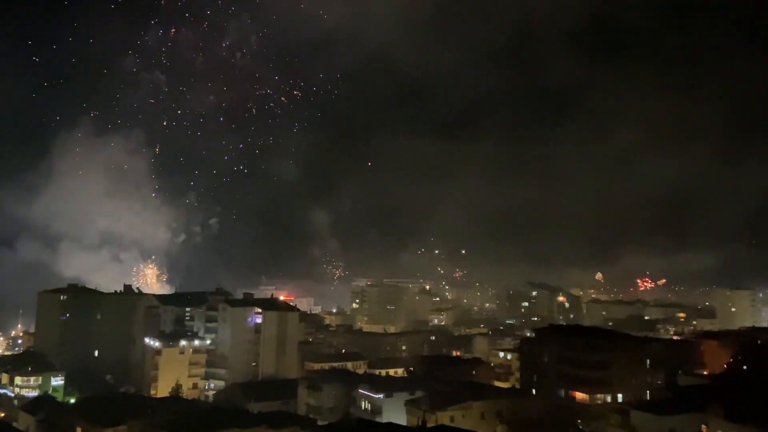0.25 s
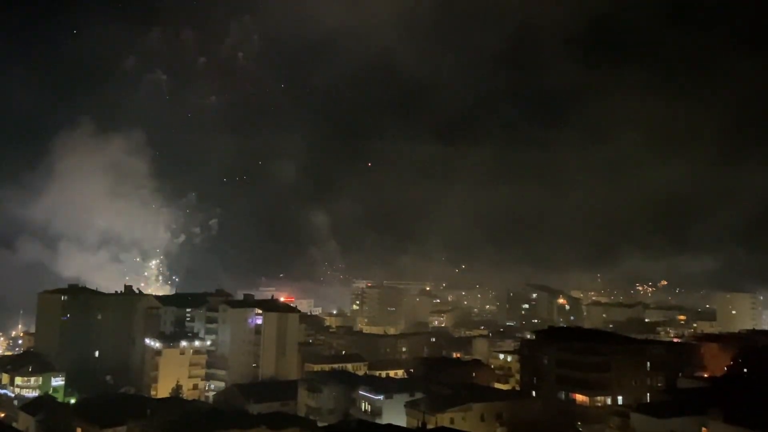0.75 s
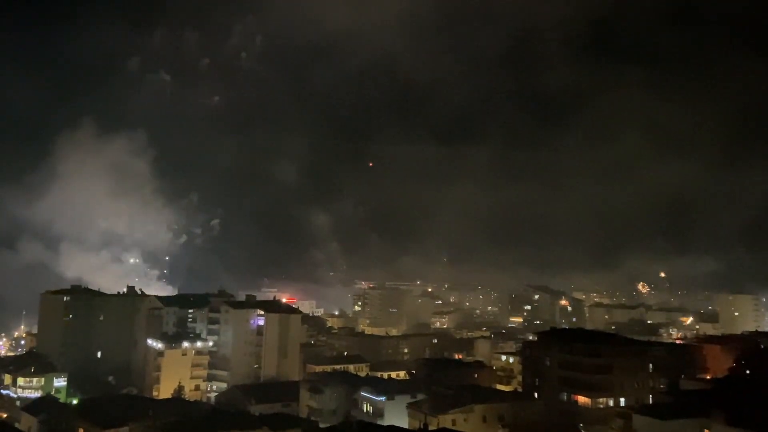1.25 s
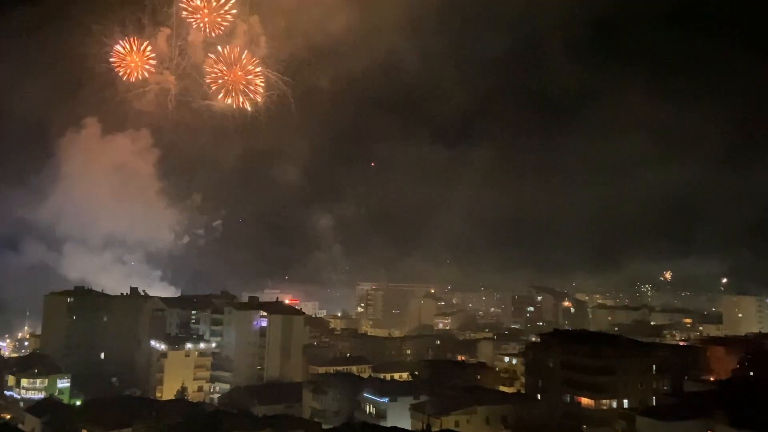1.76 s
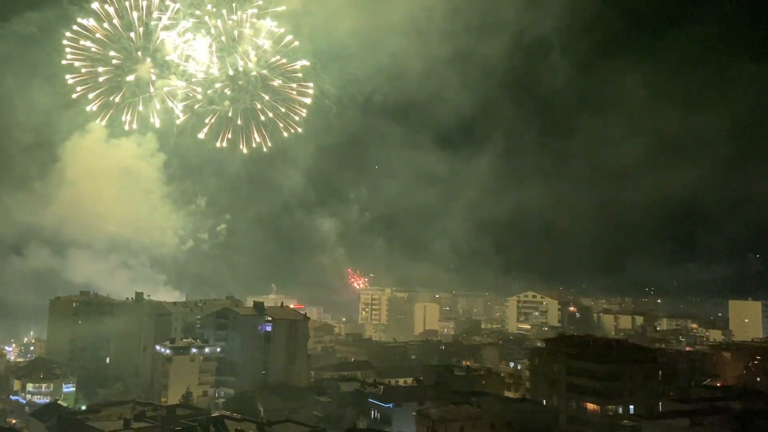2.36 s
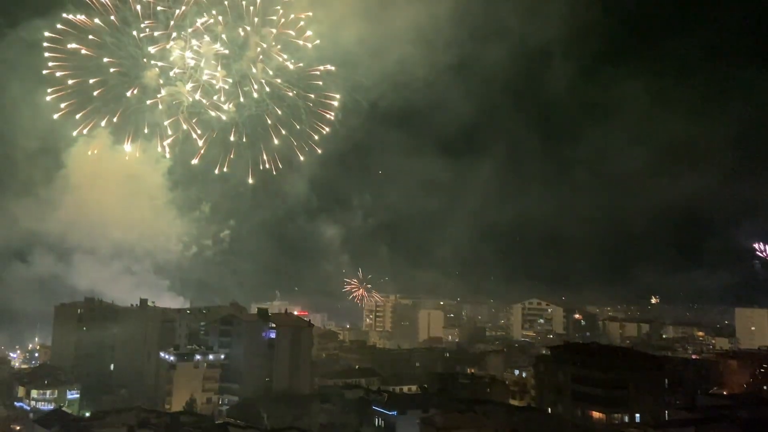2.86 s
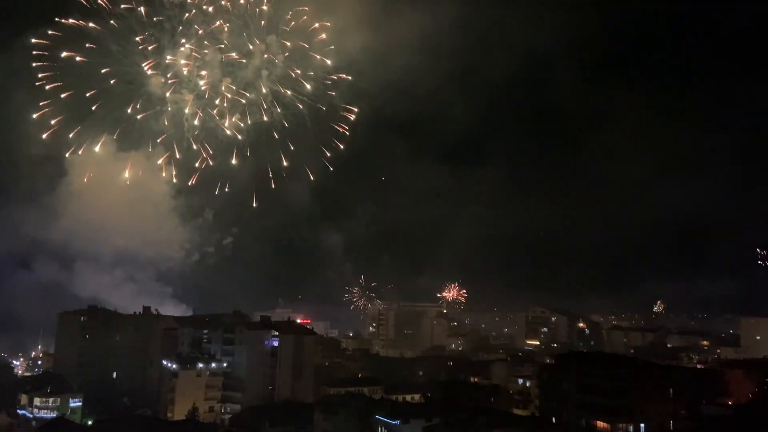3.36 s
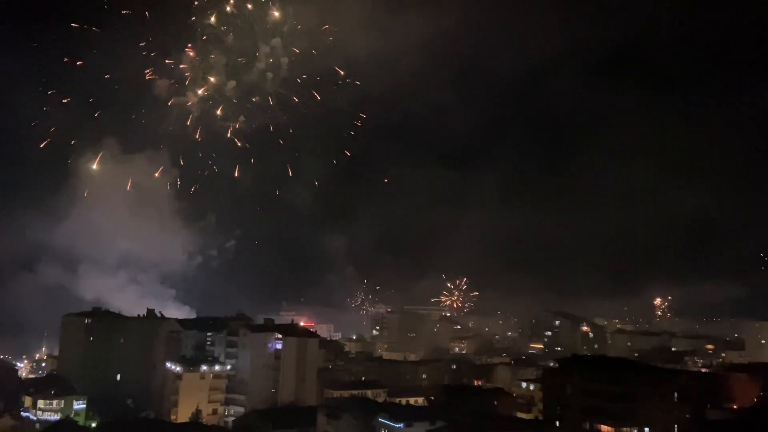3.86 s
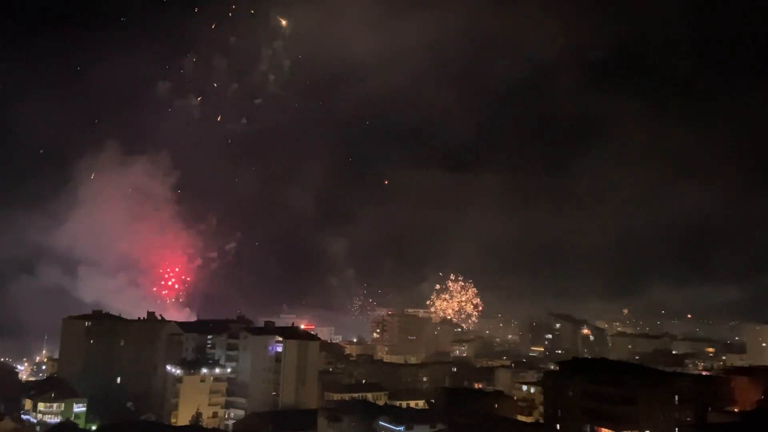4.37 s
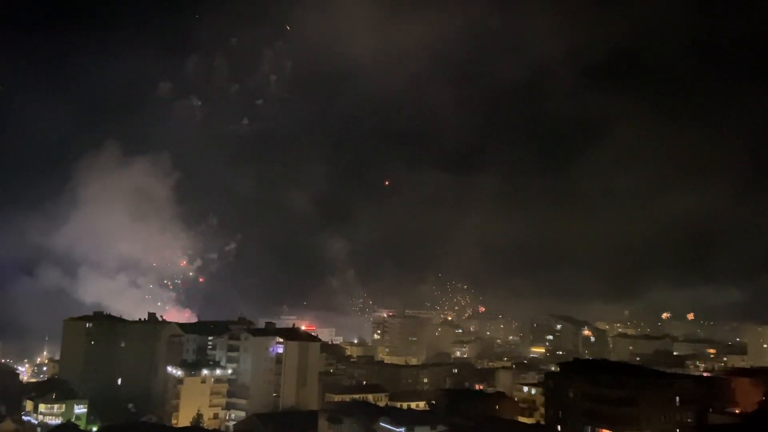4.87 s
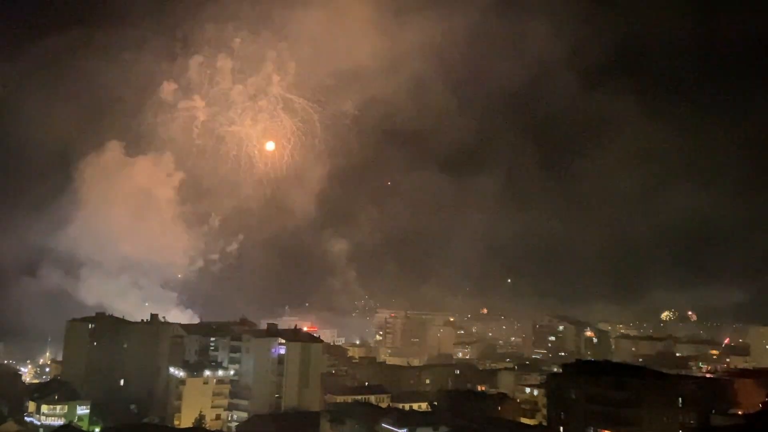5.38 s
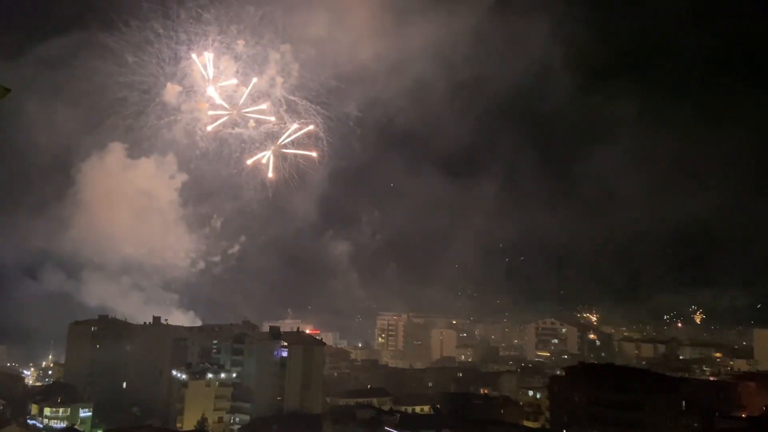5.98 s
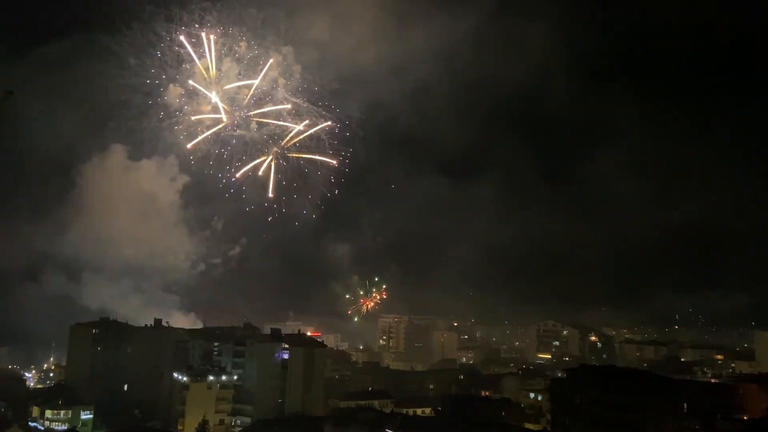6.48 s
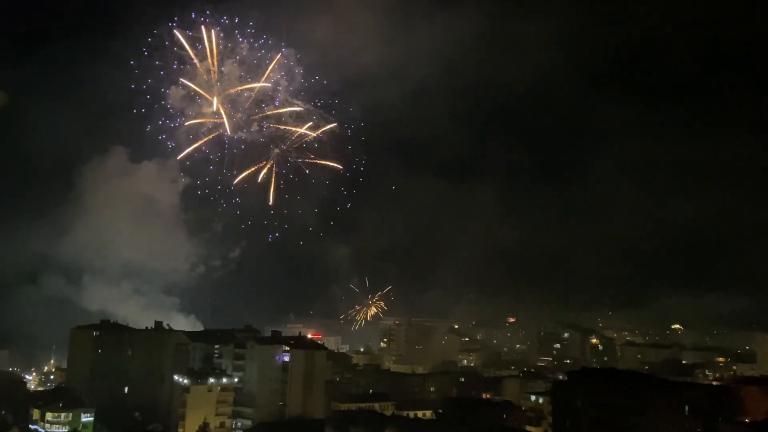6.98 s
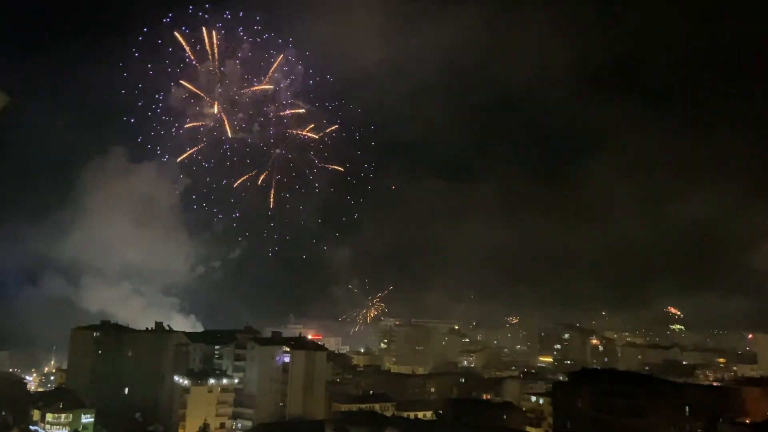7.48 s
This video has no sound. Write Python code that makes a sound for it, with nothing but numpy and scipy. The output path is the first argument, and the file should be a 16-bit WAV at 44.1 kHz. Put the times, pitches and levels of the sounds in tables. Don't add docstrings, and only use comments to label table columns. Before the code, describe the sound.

Fireworks over a night town: hard near bangs, mostly from the left, with crackling stars and a rolling roar of far bursts echoing between buildings.

```python
import sys
import numpy as np
from scipy import signal
from scipy.fft import rfft, irfft, next_fast_len
from scipy.io import wavfile
from scipy.ndimage import uniform_filter1d, minimum_filter1d

SR = 44100
rng = np.random.default_rng(int(sys.argv[2]) if len(sys.argv) > 2 else 0)


def to_linear_factor(level_db):
    exponent = np.asarray(level_db, float) / 20
    return 10 ** exponent


def pcm_store(signal):
    levels = np.round(np.clip(np.atleast_2d(signal), -1, 1) * 32767)
    wavfile.write(sys.argv[1], SR, levels.astype(np.int16).T)


N = 340893
CONTROL_STEP = 40
CONTROL_S = np.arange(0, N + CONTROL_STEP, CONTROL_STEP) / SR

LAYER_HZ = [110, 500, 2200, 6000]
LULL_DB, USUAL_DB = [-40.5, -39, -53.5, -81.5], [-20, -28, -34, -46.5]
# f/Hz, density/dB
BARRAGE_COLOUR = [(25, -41.5), (55, -5), (95, -4.5), (130, 0), (190, -3), (470, -10), (900, -17.5),
                  (1400, -21), (2000, -23), (3250, -31), (6920, -46), (8140, -50.5), (10300, -59),
                  (14300, -82.5), (16500, -98)]
# f/Hz, left-right likeness/1
LIKENESS = [(40, 0.7), (130, 0.97), (300, 0.4), (700, 0.042), (1400, 0.41), (3000, 0.67), (4600, 0.71),
            (6400, 1.6)]
# t/s, left over right/dB
BARRAGE_SIDE = [
    (0.0, 8.5),
    (3.42, 7.5),
    (3.77, 2),
    (7.73, 1.5),
]
# start t/s, rise/s, rumble level/dB, roar over rumble/dB, fade/(dB/s)
ROLLS = [(0, 0.0019, -30, 4, 7.5), (.56, 0.022, -29.5, -2.5, 47.5), (1.009, 0.026, -38, 6, 34.5),
         (1.19, 0.032, -54.5, 4.5, 24), (1.519, 0.042, -48.5, 15, 56.5), (1.713, 0.012, -37, 6.5, 60.5),
         (2.2, 0.055, -47.5, 11, 53), (2.44, 0.037, -44, 14, 75.5), (2.71, 0.02, -15.5, -10.5, 72),
         (2.78, 0.056, -24.5, -1.5, 45.5), (2.93, 0.15, -19, -3.5, 9.5), (3.6, 0.13, -24.5, 2.5, 30),
         (4.341, 0.03, -40.5, 15, 10.5), (4.791, 0.014, -28.5, 1.5, 49), (5.2, 0.037, -38, 6.5, 18.5),
         (5.55, 0.095, -35.5, -6, 20), (6.258, 0.016, -36.5, 6.5, 159.5), (5.88, 0.015, -42.5, 11, 48.5),
         (6.389, 0.008, -28.5, -0.5, 39.5), (6.629, 0.022, -10.5, -12, 158), (6.8, 0.0056, -15, -6, 47),
         (6.89, 0.045, -14.5, -11, 168), (7.0, 0.21, -15, -8, 15.5), (7.649, 0.083, -16, -8, 32)]
# start t/s, rise/s, crackle level/dB, fizz over crackle/dB, fade/(dB/s)
SALVOS = [(0, 0.00078, -38, -6, 79.5), (0.088, 0.039, -36, -13, 26), (.555, 0.011, -42, -22.5, 61),
          (1.014, 0.007, -39, -9.5, 39.5), (1.605, 0.022, -42.5, -5.5, 30),
          (1.715, 0.026, -31.5, -11, 73.5), (2.12, 0.16, -44.5, -11.5, 108.5),
          (2.44, 0.057, -45.5, -10, 122.5), (2.715, 0.0069, -38, -8, 41), (4.44, 0.019, -32.5, -16, 77),
          (2.79, 0.075, -44.5, -1.5, 130), (2.929, 0.038, -34.5, -9, 19), (3.4, 0.029, -30, -13, 30),
          (3.698, 0.017, -34.5, -14.5, 68.5), (4.345, 0.04, -35, -16.5, 17.5),
          (4.792, 0.013, -38, -33.5, 46), (5.201, 0.025, -43.5, -13.5, 84), (5.5, 0.35, -37, -38, 41.5),
          (5.892, 0.014, -48.5, -7, 49.5), (6.395, 0.01, -37, -10, 55.5), (6.65, 0.038, -33.5, -12, 146),
          (6.811, 0.034, -32, -14.5, 63), (6.95, 0.022, -34, -11, 16.5), (7.15, 0.11, -32.5, -23, 38.5)]
# middle t/s, peak level/dB, pitch
# f/Hz, half width/ms
STREET_RINGS = [(0.251, -28, 170.0, 17), (0.494, -26.5, 108, 16), (0.678, -24, 160.0, 15), (1.013, -27, 170.0, 11),
                (2.027, -28, 156, 13), (2.186, -26, 111, 12), (2.317, -32, 161, 16), (3.186, -12.5, 134, 8.3),
                (3.715, -16, 148, 18), (3.889, -19, 138, 15), (4.025, -25, 179, 11), (4.147, -26, 139, 14.0),
                (4.268, -21, 173, 13), (4.743, -27, 199, 12), (5.086, -29, 191, 18), (5.359, -25.5, 130.0, 11),
                (5.731, -28.5, 254, 10), (6.018, -32, 230.0, 11), (6.137, -28.5, 151, 14.0),
                (6.745, -25, 130.0, 13), (6.91, -6, 93, 11), (7.078, -20, 208, 16), (7.165, -20, 170.0, 14.0),
                (7.223, -18, 122, 16), (7.275, -27, 113, 12), (7.394, -15, 130.0, 13),
                (0.212, -23, 540.0, 4.9), (0.237, -23, 580, 5.1), (0.461, -24.5, 368, 6.5),
          (1.059, -24, 520.0, 5), (1.738, -27, 590.0, 4.2), (2.858, -23, 400.0, 3.3),
          (2.901, -25, 387, 4.8), (2.945, -23, 375, 5.6), (2.977, -17.5, 350, 6.6), (3.072, -20, 424, 6.2),
          (3.263, -19.5, 404, 5.6), (3.312, -23, 490.0, 5.1), (3.369, -23, 447, 5.6),
          (3.476, -18.5, 410.0, 5.6), (4.394, -29, 500.0, 6.9), (4.5, -23.5, 590.0, 6.5),
          (4.525, -22, 460, 4.6), (6.687, -25, 413, 3.5), (6.86, -28, 400.0, 5.6), (7.206, -27, 390.0, 5.1),
          (7.347, -23, 513, 7.2), (7.438, -32, 394, 4.6),
                (1.44, -29, 600, 4), (1.533, -25.5, 446, 9.6), (2.5, -36, 101, 25), (3.04, -27, 735, 7.7),
               (3.115, -17, 138, 19), (3.15, -17, 150, 11), (3.522, -17, 550, 10), (2.49, -28.5, 700, 8.0),
               (5.572, -29, 560, 6.1), (6.995, -17, 620, 4.0), (7.31, -22, 200, 11), (7.36, -18, 171, 11),
               (7.567, -14.5, 170, 10)]
# t/s, noise level before shaping/dB, centre f/Hz, length/ms
PUFFS = [(1.048, -24, 1550, 4.4), (1.591, -29.5, 1730, 6.4), (1.666, -32, 1960, 5.0),
         (1.6834, -29, 1910, 5.0), (1.738, -32, 1980, 5.0), (1.746, -25, 1630, 3.7),
         (1.787, -29, 2060, 4.5), (1.8054, -36, 2380, 5.0), (2.9644, -42, 1720, 4.3),
         (2.9974, -36, 2660, 4.4), (3.0144, -35, 2080, 4.6), (3.0614, -24, 1890, 4.2),
         (3.33, -29, 1840, 5.0), (3.3574, -31, 1670, 5.0), (3.6546, -32, 2080, 5.0),
         (3.673, -22.5, 2080, 5.0), (3.699, -21.5, 2280, 5.8), (3.7258, -20, 1570, 5.7),
         (4.373, -24, 1800, 4.1), (4.394, -20, 1720, 5), (4.4598, -33, 1790, 5.0), (4.4714, -25, 1810, 4.5),
         (4.494, -26, 1670, 5.0), (4.5244, -26, 1650, 5.0), (4.5494, -33, 2030, 5.0),
         (5.0135, -31, 1710, 5.0), (5.2744, -36, 1900, 4.3), (5.5184, -37, 2030, 5.0),
         (5.5676, -29, 1540, 9.8), (5.598, -31, 1710, 5.0), (5.6153, -32, 1950, 7.3),
         (5.6446, -32, 2000, 5.0), (5.685, -37, 2210, 5.0), (5.7215, -25.5, 1620, 4.6),
         (5.7716, -31.5, 1840, 4.5), (5.805, -29, 1650, 5.5), (5.8313, -26, 1830, 7.1),
         (5.878, -28, 1670, 7.5), (5.9394, -27, 1820, 5.0), (5.986, -27.5, 1560, 5.0),
         (6.024, -30, 1630, 5.0), (6.0578, -31, 1940, 5.0), (6.09, -27.5, 1830, 4.6),
         (6.1068, -27, 1630, 5.7), (6.1514, -42, 1870, 5.0), (6.2774, -37, 2050, 3.9),
         (6.315, -27.5, 1810, 4.3), (7.7119, -9.5, 1650, 5.8),
         (1.4258, -33, 2170, 4.0), (3.4555, -17, 1800, 4.4), (3.567, -21, 1300, 5.0),
           (3.743, -20, 2100, 5.0), (4.68, -37, 1700, 7.3), (4.70, -33, 2000, 6.6), (4.852, -31, 1700, 6.0),
           (4.879, -27, 2200, 4.2), (6.2545, -30, 1150, 7.7), (7.52, -34, 1500, 8.0),
           (7.59, -30, 1500, 8.0)]
# f/Hz, t60/s, level/dB
HOUSE_FRONTS = [
    (60, 0.42, -23.5),
    (260, 0.042, -8),
    (1010, 0.083, -20.5),
    (4000, 0.022, -2),
]
# t/s, peak level/dB
STARS = [(0.332, -34), (0.469, -29), (2.162, -35), (2.144, -36), (1.529, -43), (2.33, -34), (3.262, -23),
         (3.3106, -21), (3.8097, -32), (4.3271, -50), (4.35, -29), (4.4565, -36), (1.747, -19),
         (1.775, -25.5), (3.427, -21), (4.486, -29), (5.1023, -41), (6.482, -23), (6.765, -27),
         (6.972, -19)]
# t/s, peak level/dB, top above 5.4 kHz over that level/dB, left over right/dB
CRACKS = [(0.0005, -31, -19, 14), (0.3027, -26.5, -35, 10), (0.5564, -11, -63, 0),
          (1.0221, -19.5, -16.5, 10), (1.08, -19, -41, 4), (1.1902, -13, -52, 6.5), (1.6106, -28, -30, 3),
          (1.721, -9.5, -48, 1), (2.7164, -9, -28, 10.5), (2.7472, -22.5, -41.5, 5), (2.796, -6.5, -35, 17),
          (2.8013, -11.5, -30, -2), (2.8409, -19, -21.5, 7), (2.9532, -22, -22.5, 8),
          (3.0609, -21.5, -48, 11), (3.4077, -7, -20, 6), (3.449, -14, -10, 14), (3.5018, -9, -48, 7),
          (3.6044, -21.5, -40, -10), (3.7374, -18, -52, -1), (4.3889, -26, -42, 9), (4.7915, -34, -54, 5),
          (4.7965, -24, -55, -1), (5.2097, -14, -49.5, 7), (5.213, -18, -50, 0), (6.3989, -24.5, -17.5, 7),
          (6.4577, -18.5, -33, 2), (6.6518, -12, -18, 14), (6.6852, -22, -32.5, 11), (6.8159, -7, -20, 12),
          (6.894, -8.5, -29, 9), (6.9267, -19, -26, 7), (6.9519, -7.5, -29.5, -8.5),
          (6.993, -12.5, -21.5, 1), (7.7097, -15.5, -61, 0)]
# t/s, left peak level/dB, overpressure/ms, left over right/dB
THUDS = [(0.1042, -10, 1.2, 25), (0.1509, -13.5, 0.23, -4), (0.1643, -6, 1.5, 18), (0.57, -5.5, 0.71, 28),
         (0.7243, -8, 1.2, 17), (1.071, -8, 0.066, 11), (1.1984, -10.5, 0.7, 10), (1.528, -8.5, 0.16, 15),
         (1.584, -9, 0.39, 8), (1.7533, -4, 0.34, 26), (2.163, -9, 0.54, 11), (2.253, -14.5, 0.36, 3),
         (2.7231, -3, 3, 21), (2.7419, -3.5, 2, 26), (3.158, -6, 3.4, 13), (3.616, -8.5, 0.84, 1),
         (4.4845, -6, 0.045, 2), (4.802, -9, 0.99, 9), (4.8693, -11, 0.23, 15), (5.2187, -6.5, 0.78, 5),
         (5.2904, -9, 0.71, 0.5), (5.5679, -15.5, 0.28, 6), (6.255, -15, 1, 0), (6.3157, -23, 0.74, 9),
         (6.4497, -7, 0.074, 11), (6.6595, -8, 4.2, -1), (6.6858, -7.5, 1.1, 1), (7.497, -8.5, 1.2, 15),
         (7.56, -11, 3, 1), (7.654, -7.5, 4.1, 1), (2.4950, -13.5, 0.26, 5), (2.8098, -13, 0.24, 12),
         (4.3518, -16, 0.5, 0), (5.56, -13, 0.56, 3), (6.9535, -7, 0.58, 11), (3.19, -10, 1.7, 11),
         (3.34, -4.5, 4.4, 7)]
# t/s, left peak level/dB, overpressure/ms, ground echo/ms, left over right/dB
SHELLS = [(0.301, -5.5, 1, 2, 8), (0.557, 6, 1.16, 4.5, 8.5), (1.0224, -3.5, 0.71, 2.52, 14),
          (1.1906, 5.5, 0.53, 2.57, 12), (1.721, -2.5, 0.23, 4.8, 7.5), (1.8691, -5, 0.84, 6.3, 9),
          (2.717, 8, 2.1, 2.45, 15), (2.7965, 12.5, 0.47, 5.6, 20), (3.408, 4, 0.59, 1.8, 4.5),
          (3.4503, 3.5, 0.49, 5.2, 17), (3.502, 6, 0.64, 2.34, 10), (3.7379, 3, 0.9, 3.74, 2.5),
          (4.3281, -5.5, 0.65, 3.5, 7), (4.7924, 8, 0.66, 4.2, 4), (5.2109, 5, 0.74, 2.53, 5),
          (6.241, -5, 0.67, 6.13, 0), (6.3017, -7.5, 0.75, 1.98, 3.5), (6.3988, -4, 0.7, 2.74, 3),
          (6.652, 7.5, 1.5, 2.87, 5.5), (6.8166, 7.5, 1.24, 2.1, 8), (6.895, 5.5, 1.2, 2.45, 6),
          (6.953, -16.5, 0.21, 2.2, -14), (6.9931, -3.5, 0.94, 1.6, 17), (7.7084, 4, 1.2, 3.66, 4.5)]


def rms_one(x):
    return x / np.sqrt(np.mean(x ** 2) + 1e-20)


def at_hz(points, hz):
    points_hz, values = np.transpose(points)
    return np.interp(np.log(hz), np.log(points_hz), values)


def band(x, low_hz, high_hz):
    sos = signal.butter(2, [low_hz, min(high_hz, .45 * SR)], "band", fs=SR, output="sos")
    return signal.sosfilt(sos, x)


def dull(x, hz):
    r = np.exp(-2 * np.pi * hz / SR)
    return signal.lfilter([1 - r], [1, -r], x)


def phase_shift(x, hz):
    k = np.tan(np.pi * hz / SR)
    c = (k - 1) / (k + 1)
    return signal.lfilter([c, 1], [1, c], x)


def drift(rate_hz):
    r = np.exp(-2 * np.pi * rate_hz * CONTROL_STEP / SR)
    noise = rng.standard_normal(len(CONTROL_S) + 2000)
    return rms_one(signal.lfilter([1], [1, -2 * r, r * r], noise)[2000:])


def stretch(slow):
    return np.interp(np.arange(N) / CONTROL_STEP, np.arange(len(slow)), slow)


def pan(left_right_db):
    return to_linear_factor([[left_right_db / 2], [-left_right_db / 2]])


def barrage_side_db(t_s):
    return np.interp(t_s, *np.transpose(BARRAGE_SIDE))


def add(out, s, wave):
    i = round(s * SR)
    out[:, i:i + wave.shape[1]] += wave[:, :N - i]


def swell(rows, upper, fade_share):
    start_s, rise_s, level_db, upper_db, fade_db_s = np.transpose(rows)[:, :, None]
    since_s = CONTROL_S - start_s
    fade_db = fade_share * fade_db_s * np.maximum(since_s - rise_s, 0)
    level = to_linear_factor(level_db + upper * upper_db - fade_db)
    return np.sum((np.clip(since_s / rise_s, 0, 1) * level) ** 2, axis=0)


def layer_swells_db():
    powers = [swell(ROLLS, 0, 0.8), swell(ROLLS, 1.0, 1), swell(SALVOS, 0, 0.7), swell(SALVOS, 0.96, 1)]
    return np.array([10 * np.log10(power + to_linear_factor(2 * lull_db)) - usual_db
                     for power, lull_db, usual_db in zip(powers, LULL_DB, USUAL_DB)])


def far_bursts(pops_per_s=700.0, pop_spread_db=4.5, low_pop_share=0.41, high_pop_share=0.37):
    sizes = to_linear_factor(pop_spread_db * np.minimum(rng.exponential(1, (2, N)), 5)) * rng.choice([-1, 1], (2, N))
    chance = pops_per_s * stretch(to_linear_factor(2.5 * drift(15))) / SR
    pops = rms_one(sizes * (rng.random((2, N)) < chance))
    wash = rng.standard_normal((2, 2, N))
    share = np.array([low_pop_share, high_pop_share]).reshape(2, 1, 1, 1)
    return np.sqrt(share) * pops + np.sqrt(1 - share) * wash


def barrage(level_db=-23.5, patchy_db=1.61, top_swell=1.9, lag_cycles=0.58):
    swells_db = layer_swells_db()
    half_pan_db = barrage_side_db(CONTROL_S) / 2 * np.array([[1], [-1]])
    sources = far_bursts()
    out, together, edges_hz = 0, drift(9.6), 30 * 2 ** np.arange(0, 9.6, .5)
    for k, (low_hz, high_hz) in enumerate(zip(edges_hz, edges_hz[1:])):
        hz = np.sqrt(low_hz * high_hz)
        near, other = band(sources[int(hz > 2000), k % 2], low_hz, high_hz)
        place = np.interp(np.log(hz), np.log(LAYER_HZ), range(4))
        swell_db = np.maximum(1 - abs(place - np.arange(4)), 0) @ swells_db
        swell_db = np.interp(CONTROL_S - lag_cycles / hz, CONTROL_S, swell_db)
        swell_db = swell_db * at_hz([(4600, 0.95), (9100, top_swell)], hz)
        chance_db = patchy_db * (0.72 * together + drift(10.6))
        left, right = to_linear_factor(swell_db + chance_db + half_pan_db * (hz < 6000))
        alike = np.clip(at_hz(LIKENESS, hz), 0, 1)
        far_side = alike * near + np.sqrt(1 - alike ** 2) * other
        out = out + np.array([stretch(left) * near, stretch(right) * far_side])
    size = next_fast_len(N)
    colour = to_linear_factor(at_hz(BARRAGE_COLOUR, np.arange(1, size // 2 + 2) * SR / size))
    return to_linear_factor(level_db) * rms_one(irfft(rfft(out, size) * colour, size)[:, :N])


def booms(early_cycles=1.306, sag=0.16):
    out = np.zeros((2, N))
    rows = STREET_RINGS
    for (s, db, hz, half_ms), phase in zip(rows, rng.random(len(rows))):
        ms = np.arange(-3 * half_ms, 3 * half_ms, 1000 / SR)
        cycles = hz * ms / 1000 * (1 - sag * ms / half_ms / 4) + phase
        wave = np.exp(-(ms / half_ms) ** 2) * np.sin(2 * np.pi * cycles)
        start_s = s + ms[0] / 1000 - early_cycles / hz
        add(out, start_s, wave * to_linear_factor(db) * pan(barrage_side_db(s)))
    return out


def puffs(gain_db=-2.5, octaves=0.42, rise_ms=0.69, alike=0.76, air_hz=3900.0):
    out, ms = np.zeros((2, N)), np.arange(1500) / SR * 1000
    rows = PUFFS
    for (s, db, hz, length_ms), noise in zip(rows, rng.standard_normal((len(rows), 2, 1500))):
        shape = np.minimum(ms / rise_ms, 1) * np.exp(-ms / length_ms)
        pair = np.array([noise[0], alike * noise[0] + np.sqrt(1 - alike ** 2) * noise[1]])
        pair = rms_one(band(pair, hz / 2 ** octaves, hz * 2 ** octaves))
        puff = band(pair * shape, hz / 2.4, hz * 4.4)
        puff = dull(dull(puff, air_hz), air_hz)
        add(out, s, puff * to_linear_factor(db + gain_db) * pan(barrage_side_db(s)))
    return out


def house_fronts(x):
    t_s, tail = np.arange(12000) / SR, 0
    hits = rng.standard_normal((2, 12000)) * (rng.random((2, 12000)) < .05) * (t_s > .006)
    for hz, t60_s, db in HOUSE_FRONTS:
        tail = tail + to_linear_factor(db - 60 * t_s / t60_s) * band(hits, hz / 2, hz * 2)
    return signal.oaconvolve(x, tail, axes=1)[:, :N]


def sideways(x, turn_hz=1360.0, turn_width_hz=490.0):
    r = np.exp(-np.pi * turn_width_hz / SR)
    poles = [1, -2 * r * np.cos(2 * np.pi * turn_hz / SR), r * r]
    ahead = signal.lfilter(poles[::-1], poles, x[1, ::-1])[::-1]
    return np.array([x[0], ahead])


def roof_shimmer(top, level_db=-41.0, t60_s=0.36, rise_s=0.027):
    t_s = np.arange(12000) / SR
    envelope = np.minimum(t_s / rise_s, 1) * to_linear_factor(level_db - 60 * t_s / t60_s)
    tail = band(envelope * rng.standard_normal((1, 12000)), 5900, 14000)
    return band(signal.oaconvolve(top, tail, axes=1)[:, :N], 5900, 14000)


def cracks(body_db=14.0, top_db=22.0, spit_ms=2.1, spit_db=-16.0, rise_ms=1.353, top_ms=1.5,
           star_top_db=-57.5, star_side_db=6):
    body, top, ms = np.zeros((2, N)), np.zeros((2, N)), np.arange(400) / SR * 1000
    rows = CRACKS + [(s, db, star_top_db, star_side_db) for s, db in STARS]
    spits = rng.standard_normal((len(rows), 2, 400))
    for (s, db, rel_db, pan_db), spit in zip(rows, spits):
        wave = to_linear_factor(spit_db) * spit * np.exp(-ms / spit_ms)
        wave[:, 0] += 1
        add(body, s + rise_ms / 1000, wave * to_linear_factor(db) * pan(pan_db))
        add(top, s + rise_ms / 1000, wave * np.exp(-ms / top_ms) * to_linear_factor(db + rel_db))
    body = band(band(body, 1600, 4200), 860, 12000)
    top = top + roof_shimmer(top)
    top = band(band(top, 5400, 20000), 5400, 21000)
    return to_linear_factor(body_db) * body + to_linear_factor(top_db) * top


def blast_shape(u):
    return (1 - u) * np.exp(-u)


def blasts(thump_db=-29.0, thump_stretch=0.94, echo_db=-5.5, right_echo_ms=0.52, right_echo_db=1.0,
           front_hz=4200.0, steepening=0.46, ground_hz=4000.0, shadow_db=11.0, build_s=.00045,
           shell_air_hz=950, thud_air_hz=550, thud_echo_ms=4.59):
    out, ms = np.zeros((2, N)), np.arange(2400) / SR * 1000
    echoes_ms = thud_echo_ms * rng.uniform(0.556, 1.464, len(THUDS))
    rows = [(*row, shell_air_hz) for row in SHELLS]
    rows += [(s, db, length_ms, echo_ms, pan_db, thud_air_hz)
             for (s, db, length_ms, pan_db), echo_ms in zip(THUDS, echoes_ms)]
    for s, db, length_ms, echo_ms, pan_db, air_hz in rows:
        s = s + build_s
        steep_hz = front_hz * to_linear_factor(steepening * db)
        thump = to_linear_factor(thump_db) * length_ms ** 2 * blast_shape(ms / length_ms / thump_stretch)
        wave = dull(blast_shape(ms / length_ms) + thump, air_hz)
        wave = dull(dull(dull(wave, steep_hz), steep_hz), 0.73 * steep_hz)
        wave = wave / wave.max() * to_linear_factor(db) * to_linear_factor([[0], [-pan_db]])
        wave[1] -= np.clip(pan_db / shadow_db, 0, 2) * band(wave[1], 850.0, 1900.0)
        add(out, s, wave)
        echo = dull(wave, ground_hz)
        add(out, s + echo_ms / 1000, echo * [[to_linear_factor(echo_db)], [0]])
        add(out, s + (echo_ms + right_echo_ms) / 1000, echo * [[0], [to_linear_factor(echo_db + right_echo_db)]])
    return out


def scene():
    near = blasts() + cracks()
    around = house_fronts(near) + barrage() + puffs()
    return near + sideways(around) + booms()


def treble_stereo(x, joint_hz=6500, joint_share=0.063, flips_hz=(7950, 10000, 12150, 14200), flip_width_hz=260,
          notch_hz=9000.0, notch_width_hz=250.0, notch_depth=0.87):
    size = next_fast_len(N + 999)
    x = np.hstack([x, x[:, :-1000:-1] * np.linspace(1, 0, 999)])
    hz = np.arange(size // 2 + 1) * SR / size
    pair = rfft(x, size)
    shared = joint_share * (1 + np.tanh((hz - joint_hz) / flip_width_hz)) / 2
    pair = pair + (pair.mean(axis=0) - pair) * shared
    pair = pair * (1 - notch_depth * np.exp(-((hz - notch_hz) / notch_width_hz) ** 2))
    turns = sum(1 + np.tanh((hz - flip_hz) / flip_width_hz) for flip_hz in flips_hz) / 4
    return irfft(pair * np.exp(2j * np.pi * turns * [[0], [1]]), size)[:, :N]


def limiter(x, ceiling=.95):
    room_left = np.minimum(ceiling / (abs(x) + 1e-9), 1)
    return x * uniform_filter1d(minimum_filter1d(room_left, size=81), size=81)


def top_cut(x):
    return signal.sosfilt(signal.butter(12, 16510, fs=SR, output="sos"), x)


def record(dry):
    x = signal.sosfilt(signal.butter(3, 46.0, "high", fs=SR, output="sos"), treble_stereo(dry))
    hiss = band(band(rng.standard_normal((2, N)), 11700, 12300), 11700, 12300)
    x = x + to_linear_factor(-95.5) * rms_one(hiss)
    x = signal.sosfilt(signal.butter(3, 12500.0, fs=SR, output="sos"), x)
    x = signal.sosfilt(signal.cheby2(10, 50, 17100, fs=SR, output="sos"), x)
    for hz in np.geomspace(28, 700, num=10):
        x = phase_shift(x, hz)
    x = limiter(x)
    x = x * np.minimum(np.arange(N, 0, -1) / 200, 1)
    return top_cut(x)


dry = scene()
out = record(dry)
pcm_store(out)
```